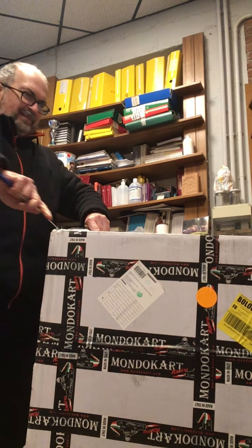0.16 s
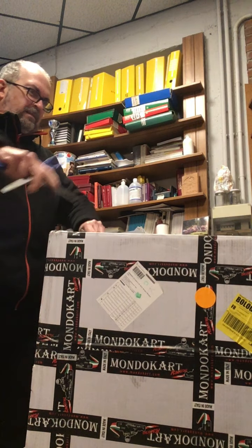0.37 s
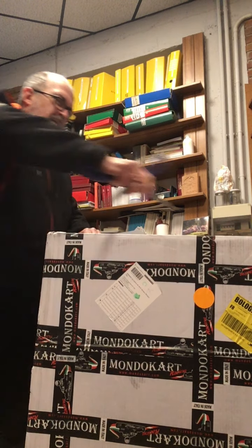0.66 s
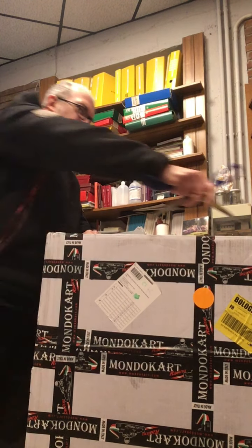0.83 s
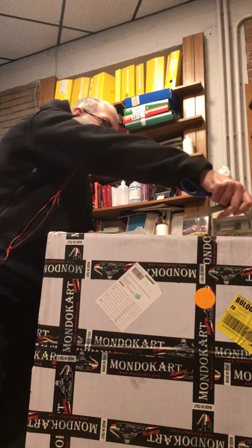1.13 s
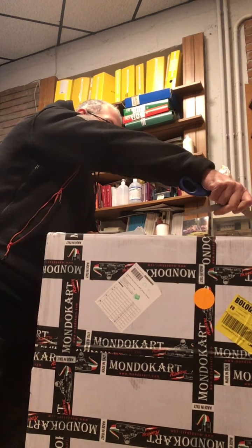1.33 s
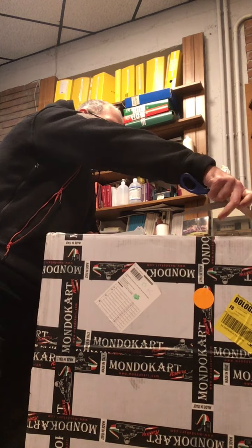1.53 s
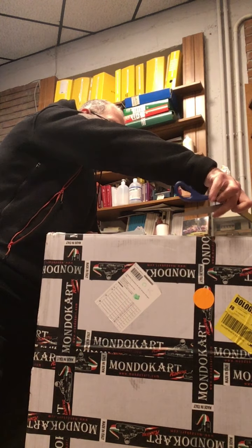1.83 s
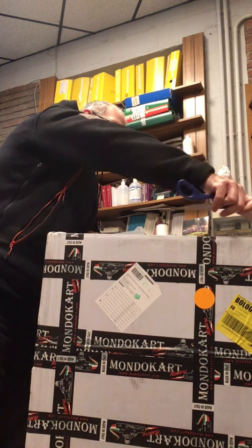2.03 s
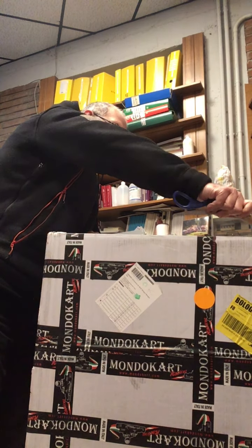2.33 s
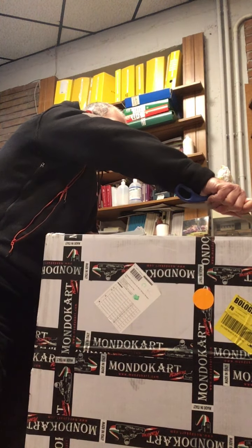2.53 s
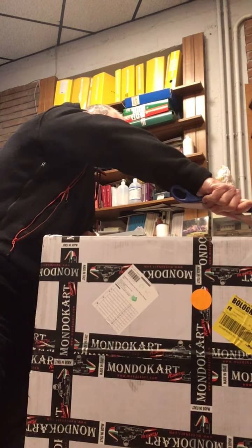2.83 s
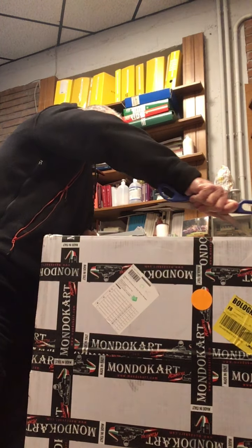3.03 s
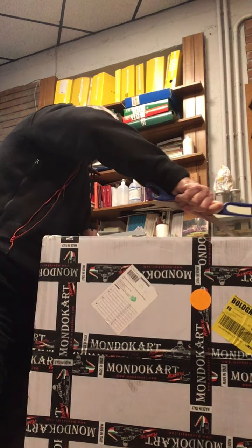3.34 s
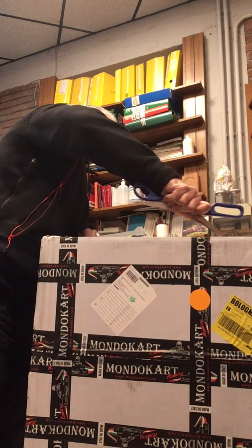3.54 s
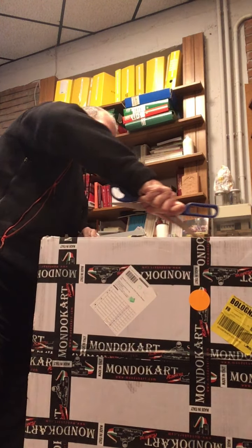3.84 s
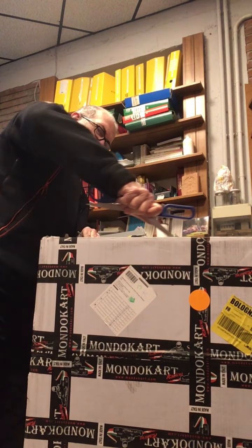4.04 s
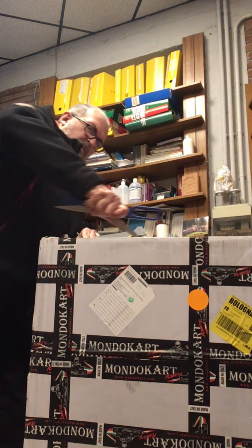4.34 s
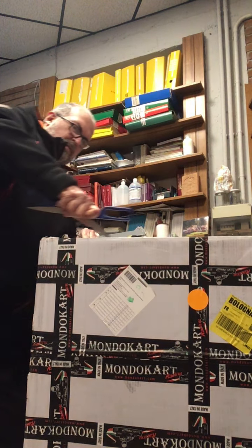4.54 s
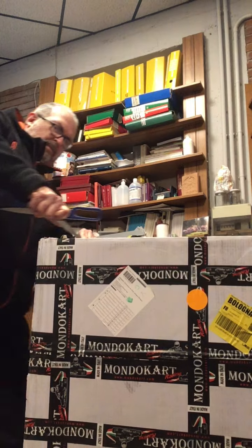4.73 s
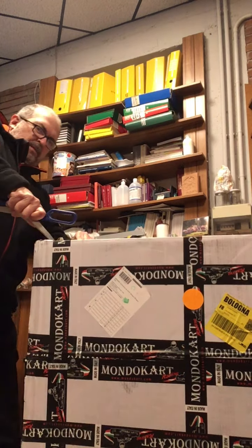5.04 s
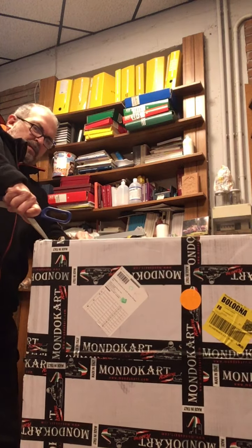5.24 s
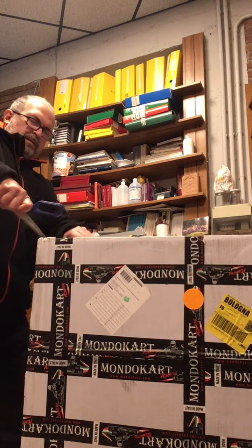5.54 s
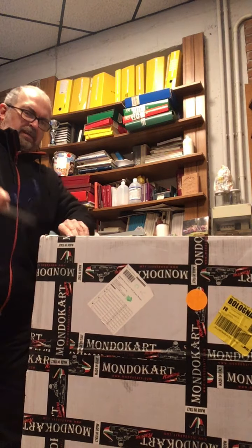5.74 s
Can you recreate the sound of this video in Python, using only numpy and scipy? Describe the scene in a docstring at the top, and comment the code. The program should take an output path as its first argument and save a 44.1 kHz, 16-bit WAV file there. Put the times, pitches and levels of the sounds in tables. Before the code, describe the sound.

In a quiet workshop, scissors scratch and click softly, then thump and tear raspingly through tape and hollow cardboard before thinning out.

```python
"""A small quiet workshop, with a phone a metre from a large cardboard box; steady room air lies under it all.
First an open scissor blade scrapes lightly on card: dense random snaps, filtered as card or tape.
Handling ticks (crackle and ringing steel), scuffs with a note and soft knocks follow.
From 2.9 s, after a hard knock, the blade tears along the taped seam, then from about 4.05 s mostly bare card;
hollow and lid hum under each push. The tearing thins out after 5 s, with two last knocks on the box."""
import sys
import numpy as np
from scipy import signal
from scipy.fft import rfft, irfft
from scipy.io import wavfile

SR = 44100
rng = np.random.default_rng(int(sys.argv[2]) if len(sys.argv) > 2 else 0)


def gain_from_db(level_db):
    """Convert decibel levels to linear amplitude factors (20 dB per decade)."""
    decades = np.asarray(level_db, float) / 20
    return 10 ** decades


def persist_wave(psi):
    """Save psi, clipped to +-1, as 16-bit WAV."""
    counts = np.round(np.clip(psi, -1, 1) * 32767).astype(np.int16)
    wavfile.write(sys.argv[1], SR, np.atleast_2d(counts).T)


N = 259676
T = np.arange(N) / SR  # s

# each push of blade or hand over the box: start t/s, held t/s, scrape level/dB, weight on the box level/dB,
# t/s to die away by 20 dB (before the linger factor; negative means at once)
PUSHES = [(-.03, 0.058, -57, -44.5, 0.09), (.105, 0.042, -65.5, -53.5, -0.1), (.145, 0.051, -71, -65, 0),
          (0.191, 0.085, -58.5, -45, 0.12), (.3, 0.032, -61, -63, -0.1), (0.334, 0.017, -58.5, -52, -0.15),
          (.35, 0.013, -68, -59.5, 0.68), (.4, 0.13, -68.5, -88, 0.7), (.93, 0.032, -81, -64, 0.2),
          (1.076, 0.033, -64, -57.5, 0.1), (1.14, .04, -80, -70, 0.2), (1.2, 0.073, -76, -68, -0.07),
          (1.28, 0.051, -69, -87, .15), (1.572, 0.026, -69.5, -73, -0.5), (1.799, 0.034, -82, -65, -1.4),
          (1.836, 0.033, -66, -61, 0.16), (1.9, 0.013, -83, -73, 0.3), (2.388, .12, -75.5, -66, .2),
          (2.52, .12, -70.5, -64, 0.6), (2.68, 0.15, -68, -65.5, 0.8), (2.775, .03, -65, -63, 0.5),
          (2.812, 0.11, -56, -56, -1.7), (2.92, .06, -45.5, -38.5, .2), (3.002, 0.073, -44.5, -43, 0.13),
          (3.1, .05, -47, -47, 0.2), (3.16, 0.028, -46.5, -44, 0.14), (3.27, 0.038, -58.5, -58, -0.5),
          (3.308, .065, -44.5, -43, 0.17), (3.403, 0.066, -45, -40.5, 0.17),
          (3.528, .02, -43.5, -44.5, 0.1339), (3.593, 0.059, -45.5, -44, 0.34), (3.68, .1, -46, -44, 0.08),
          (3.794, .13, -41.5, -41, 0.12), (3.939, 0.09, -41.5, -40, 0.02), (4.037, 0.041, -50.5, -45, 0.02),
          (4.085, 0.046, -52.5, -43.5, 0.04), (4.13, .035, -60.5, -50.5, -0.5),
          (4.163, 0.14, -51.5, -43.5, 0.13), (4.31, 0.16, -50, -42, 0.25), (4.49, 0.1, -51.5, -43.5, 0.23),
          (4.59, 0.1, -50.5, -43.5, 0.21), (4.7, 0.074, -48, -44.5, 0.17), (4.8, 0.097, -50.5, -45, 0.19),
          (4.89, 0.13, -52, -44, 0.0946), (5.11, 0.11, -71.5, -60, 1.05), (5.196, .075, -57, -50, 0.18),
          (5.298, 0.035, -63.5, -50.5, 0.14), (5.44, .04, -63, -52, 0.25), (5.571, 0.076, -66, -58, -0.08),
          (5.624, 0.026, -57.5, -44, 0.06), (5.664, 0.019, -80, -43.5, -0.02), (5.72, .07, -75, -65, -0.7)]
# what lies under the contact as it travels: t/s, share of taut tape 0-1, wall note f/Hz, lid note f/Hz,
# lid level/dB against the weight
PLACE = [(0, 0.2, 124, 338, -5), (.2, 0, 114.4, 300, -17), (.36, 0.11, 130, 317, -9.5),
         (1.0, 0.4, 110, 348, -16.5), (1.11, 0, 110, 363.5, 3), (1.25, 0.17, 127.3, 359, -19.5),
         (1.75, 0.17, 175, 293.8, -16), (1.87, 0.42, 180.5, 290, -2), (2.05, 0.17, 160, 295, -20),
         (2.5, 0.47, 110, 309, -16), (2.9, .78, 140, 344, -9.5), (3.05, .83, 145.9, 362, -19.5),
         (3.2, 0.92, 189, 351, -4.5), (3.4, 0.97, 139.9, 360, -12), (3.75, 0.87, 165.4, 364, -4),
         (3.87, 0.87, 143.5, 360, -1), (3.94, 0.9, 145.3, 344.8, 4), (4.02, 0.98, 145, 341.7, 2),
         (4.06, 0.1, 145, 342, -0.5), (4.3, 0.11, 134.9, 345, -13), (4.5, 0.1, 125, 365, -6.5),
         (4.62, 0.16, 138, 345, -10), (4.75, 0.12, 126.2, 296, -10.5), (4.95, .27, 139.4, 300, -19),
         (5.2, 0.18, 105, 295, -5), (5.45, 0.06, 105, 295, -13.5), (5.89, 0.1, 105, 330, -12.5)]
# colour of snaps heard through bare card: f/Hz, level/dB (per Hz)
CARD_COLOUR = [(650, -31), (1100, -30), (1340, 1.5), (1640, -3.5), (2140, -7), (2560, -4.5), (4670, -4.5),
               (6450, -5.5), (7790, -6.5), (9730, -0.5), (10600, -9), (12000, -6.5), (15700, -12.5)]


def unit(x):
    """Scale to rms 1."""
    return x / np.sqrt(np.mean(x ** 2))


def colour(x, points, size=1024):
    """Causal filter with the gain of (Hz, dB) points, from the folded cepstrum."""
    hz, db = np.transpose(points)
    bin_hz = np.arange(size // 2 + 1) * SR / size
    gain_db = np.interp(np.log(bin_hz + 1), np.log(hz), db)
    cepstrum = irfft(np.log(gain_from_db(gain_db)))
    cepstrum[1:size // 2] *= 2
    cepstrum[size // 2 + 1:] = 0
    return signal.fftconvolve(x, irfft(np.exp(rfft(cepstrum))))[:N]


def band(x, lo_hz, hi_hz):
    """Steep band-pass."""
    return signal.sosfilt(signal.butter(4, [lo_hz, hi_hz], "bandpass", fs=SR, output="sos"), x)


def ring(x, modes):
    """Sum of resonators (Hz, width Hz, dB)."""
    return sum(gain_from_db(db) * signal.lfilter(*signal.iirpeak(hz, hz / width, SR), x) for hz, width, db in modes)


def jerks(rate, fade_s):
    """Uneven grip: slips of bounded size at random moments (rate per s) that die away; mean 0, spread 1."""
    slips = (rng.random(N) < rate / SR) * rng.random(N)
    x = signal.lfilter([1], [1, -np.exp(-1 / (fade_s * SR))], slips)
    return unit(x - x.mean())


def patchy(x, modes, patchy_db):
    """Each resonance, with steep flanks, comes and goes on its own as the contact point moves."""
    total = 0
    for hz, width, db in modes:
        steep = ring(ring(x, [(hz, 3 * width, 0)]), [(hz, width, db)])
        total = total + gain_from_db(patchy_db * jerks(16, 0.034)) * steep
    return unit(total)


def hum(hz, width, steady):
    """A resonance kept alive by rubbing: gliding note, phase wandering within the width, size evened by steady 0-1."""
    slow = signal.butter(2, width / 2, fs=SR, output="sos")
    wander = signal.sosfilt(slow, rng.standard_normal((2, N)))
    wander = wander / (np.hypot(*unit(wander)) + 0.11) ** steady
    phase = 2 * np.pi * np.cumsum(hz) / SR
    return unit(wander[0] * np.cos(phase) + wander[1] * np.sin(phase))


def columns(table):
    """One value a sample for each column after the time."""
    s, *rest = np.transpose(table)
    return [np.interp(T, s, c) for c in rest]


def card_to_tape(tape, pair):
    """Blend a setting given for (bare card, taut tape) by the share of tape."""
    return np.interp(tape, (0, 1), pair)


def pushes(levels_db, lag, linger, idle_db):
    """Every push rises, holds, dies away and leaves a faint trail; their powers add. Returns dB."""
    bite_s = (0.015, 0.0023)  # rise on (bare card, taut tape), before the lag factor
    trail_db, trail_s = -17, 0.2  # card creeps back: level against the push, s to lose 20 dB
    place_s, tape_share = np.transpose(PLACE)[:2]
    power = gain_from_db(idle_db + 2.1 * jerks(8, 0.028)) ** 2
    for (s, held, _, _, dies), db in zip(PUSHES, levels_db):
        first = max(int(s * SR), 0)
        t = T[first:first + SR] - s
        rise_s = lag * card_to_tape(np.interp(s, place_s, tape_share), bite_s)
        after = np.clip(t - held, 0, 1)
        release_db = -20 * after / max(dies * linger, 0.003)
        fall_db = np.maximum(release_db, trail_db - 20 * after / trail_s)
        power[first:first + SR] += (np.clip(t / rise_s, 0, 1) * gain_from_db(db + fall_db)) ** 2
    return 10 * np.log10(power)


def fibres(rate, scatter_db):
    """Tiny snaps of very unequal size over a fine rubbing noise."""
    size = gain_from_db(scatter_db * rng.exponential(1, N)) * rng.standard_normal(N)
    snaps = (rng.random(N) < rate / SR) * size
    return unit(unit(snaps) + 1.5 * rng.standard_normal(N))


def tearing(hiss_db, rasp_db, tape, grip):
    """Snaps sound through tape or card; the lower rasp has its own snaps, which ring the slit edges."""
    # snaps through taut tape: f/Hz, level/dB (per Hz)
    tape_colour = [(650, 12), (1100, -44), (1680, -54), (1830, 4), (2190, -14), (2530, -0.5), (3090, -6),
                   (4420, -5), (4880, -5.5), (5460, 7.5), (7050, 6), (9520, 0), (10500, -13),
                   (13900, -11.5), (15700, -15)]
    # ringing of the slit edge in tape, then in card: f/Hz, width f/Hz, level/dB
    tape_edge = [(1200, 820, 0), (1893, 205, 0.5), (2475, 124, 3), (3025, 37, -16), (3700, 420, -10.5),
                 (4360, 700, -3)]
    card_edge = [(1321, 123, 6.5), (1500, 104, 6), (1936, 670, 2), (2187, 84, 5.5), (3010, 300, -2),
                 (3790, 1750, -9), (4430, 88, -13)]
    # whistle of the taut film beside the slit: f/Hz, width f/Hz, level/dB
    tape_whistle = [(5550, 550, 2), (6740, 90, -9), (6870, 180, -6), (7140, 99, 7), (8900, 130, -11)]

    def gripped(rate):
        return fibres(rate, scatter_db=1.0) * gain_from_db(0.98 * grip + 0.65 * jerks(35, 0.0061))

    def hiss(points):
        return unit(band(colour(fine, points), 4590, 15200)) * gain_from_db(0.53 * jerks(43, 0.0037))

    def rasp(points, edge):
        body = unit(band(colour(coarse, points), 740, 4730))
        edge_ring = patchy(band(coarse, 1080, 5250), edge, patchy_db=3)
        return unit(body + gain_from_db(-3.5) * edge_ring)

    fine, coarse = gripped(5000), gripped(1800)
    tape_hiss = hiss(tape_colour) + gain_from_db(-7.5) * patchy(fine, tape_whistle, patchy_db=5.0)
    all_hiss = tape * tape_hiss + (1 - tape) * hiss(CARD_COLOUR)
    all_rasp = tape * rasp(tape_colour, tape_edge) + (1 - tape) * rasp(CARD_COLOUR, card_edge)
    return gain_from_db(hiss_db) * all_hiss + gain_from_db(rasp_db) * all_rasp


def box(boom_db, wall_db, lid_db, flap_db, wall_hz, lid_hz, grip):
    """The dragging force shakes the air hollow, walls, lid and flaps of the box."""
    # resonances of the air hollow, then of the flaps: f/Hz, width f/Hz, level/dB
    hollow = [(60.8, 23, -2.5), (105, 21.5, -3.5), (139.7, 11.2, -0.5), (187, 29, -12)]
    flaps = [(445.4, 43, 7.5), (521, 13.7, 9.5), (602.5, 72, 7), (695, 113, 2), (897, 70, 1),
             (955, 130, -6.5), (985, 36, -3.5), (1041, 15, -8.5)]
    shake = rng.standard_normal((2, N)) * gain_from_db(1.3 * grip)
    wall = hum(wall_hz, width=21.4, steady=0.29) * gain_from_db(wall_db)
    boom = unit(ring(shake[0], hollow)) * gain_from_db(-2.0) + wall
    lid = hum(lid_hz, width=17.7, steady=0.6) + gain_from_db(-4) * hum(lid_hz, width=90, steady=0.077)
    rattle = patchy(shake[1], flaps, patchy_db=1.5)
    return gain_from_db(boom_db) * boom + gain_from_db(lid_db) * lid + gain_from_db(flap_db) * rattle


def snags(snag_db):
    """The edge snags on lumps: short broad crackles at random moments, as loud as the scrape allows."""
    # colour of the crackle: f/Hz, level/dB (per Hz)
    snag_colour = [(500, -21), (1000, -3), (2500, -2.5), (6000, -3.5), (10000, -4), (15700, -11)]
    snags_per_s, fade_s = 60, 0.0016
    hit = (rng.random(N) < snags_per_s / SR) * gain_from_db(14.5 * rng.random(N))
    envelope = signal.lfilter([1], [1, -np.exp(-1 / (fade_s * SR))], hit)
    burst = envelope * rng.standard_normal(N)
    return gain_from_db(snag_db) * unit(colour(burst, snag_colour))


def room_air():
    """Steady noise of the quiet workshop, strongest in the bass."""
    # colour of the room: f/Hz, level/dB (per Hz)
    room_colour = [(18, -8.5), (30, -2.5), (64, 9), (81, -31.5), (156, -6), (169, -52), (238, -0.5),
                   (508, -56), (857, -21), (2140, -26), (10100, -39), (11500, -24.5), (15700, -35.5)]
    return gain_from_db(-72.5) * unit(colour(rng.standard_normal(N), room_colour, size=4096))


def ticks():
    """Each tick is a short burst of crackle mixed with ringing steel, strongest near its brightest pitch."""
    # ticks and snaps: t/s, level/dB, brightest f/Hz, metal ring share 0-1
    tick_list = [(0.396, -41, 11300, 0.64), (0.459, -45, 8710, 0.6), (0.5933, -39.5, 12000, .48),
                 (1.091, -44.5, 10100, 0.3), (1.095, -37.5, 10100, .46), (1.1093, -41, 6610, 0.46),
                 (1.1183, -48, 8730, .6), (1.5709, -38.5, 9350, 0.66), (1.841, -54, 3720, .1),
                 (1.8524, -40, 7340, 0.7), (1.855, -34.5, 4030, 0.64), (1.8572, -33.5, 10100, 0.4),
                 (1.87, -31, 7950, 0.47), (1.8763, -36, 11300, 0.4), (1.897, -38, 9150, 0.37),
                 (2.389, -66, 5940, 0.3), (2.6324, -50, 8700, 0.1), (2.815, -37.5, 6020, 0.4),
                 (2.92, -25, 6160, 0.4), (3.3093, -32, 6700, .46), (3.4054, -41, 6464, .04),
                 (3.5313, -36, 6300, 0.05), (3.598, -33.5, 6423, 0), (4.0523, -36, 4646, 0),
                 (4.073, -40, 9800, .27), (4.165, -42, 4530, 0.08), (4.2624, -35, 4090, 0.2),
                 (4.5093, -33.5, 5225, 0.4), (4.6078, -32, 9420, 0.3), (4.766, -32.5, 3940, 0.45),
                 (4.997, -33, 5970, 0.35), (5.022, -31.5, 5360, 0.3), (5.246, -36.5, 4270, .45),
                 (5.458, -37.5, 3820, 0.27), (5.635, -59, 5010, 0.55)]
    # ringing of the scissors: f/Hz, level/dB (before scatter and distance in pitch), t60 t/s
    blades = [(534, 10, 0.053), (2620, 11, .03), (3640, 18, 0.02), (4390, 14.5, 0.024), (7540, 17, 0.019),
              (8700, 22, .035), (8970, 0.5, 0.018), (9650, -4, 0.012), (11300, 12.5, 0.036),
              (11700, -24, .04), (14550, 11, 0.016)]
    crackle_ms = 2.35
    out, t = np.zeros(N + SR), T[:SR // 5]
    for s, db, top_hz, metal in tick_list:
        envelope = np.exp(-(t * 1000 / crackle_ms) ** 2) * np.tanh(t * 2500)
        crackle = colour(rng.standard_normal(len(t)) * envelope, CARD_COLOUR)[:len(t)]
        crackle = crackle + 5.5 * ring(crackle, [(top_hz, top_hz / 5, 0)])
        steel = np.zeros(len(t))
        for hz, mode_db, t60 in blades:
            scatter, turn = rng.standard_normal(2)
            gain = gain_from_db(mode_db + 2 * scatter - 1.1 * abs(np.log2(hz / top_hz)))
            steel += gain * np.sin(2 * np.pi * (hz * t + turn)) * np.exp(-np.log(1000) * t / t60)
        tick = (1 - metal) * crackle / np.abs(crackle).max() + metal * steel / np.abs(steel).max()
        first = int(s * SR)
        out[first:first + len(t)] += gain_from_db(db) * tick
    return out[:N]


def scuffs(rasp_db, grip):
    """A finger or blade tip scuffs with its own note: it swells around each moment, on the nearest one's note."""
    # scuffs: middle t/s, length t/s, note f/Hz, level/dB above the rasp
    scuff_list = [(.55, 0.069, 3150, 0), (1.22, .03, 9503, 7), (1.32, 0.056, 2202, 3),
                  (1.8, 0.36, 3550, -12), (3.0, .1, 3700, -7.5), (4.6, 0.12, 2082, -9.5),
                  (4.78, .1, 1406, -11.5), (5.32, 0.054, 1500, 3.5), (5.44, 0.045, 1598, 5.5)]
    middle, _, note_hz, _ = np.transpose(scuff_list)
    nearest = np.searchsorted((middle[1:] + middle[:-1]) / 2, T)
    swell = sum(gain_from_db(db) * np.exp(-((T - s) / length) ** 2) for s, length, _, db in scuff_list)
    tone = hum(note_hz[nearest], width=1100, steady=0.044)
    return gain_from_db(rasp_db) * swell * gain_from_db(2.5 * grip) * tone


def knocks():
    """Each knock rings the panel it lands on: a decaying sine with a soft start."""
    # knocks on the box: t/s, level/dB, ring f/Hz, t60 t/s
    knock_list = [(1.096, -51, 370, 0.045), (1.574, -58, 496, 0.14), (1.854, -48, 246, 0.16),
                  (1.872, -49, 300, 0.074), (2.545, -41.5, 125, 0.036), (2.55, -52.5, 287.7, 0.085),
                  (2.7, -47, 143, 0.12), (2.702, -45, 284, 0.06), (2.92, -28.5, 718, 0.08),
                  (2.921, -34, 450, .05), (2.924, -24, 132, 0.13), (5.234, -42.5, 118.6, 0.45),
                  (5.641, -33.5, 105, 0.15), (5.65, -46.5, 562.3, 0.093)]
    out, t = np.zeros(N), T[:SR // 3]
    for s, db, hz, t60 in knock_list:
        decay = np.exp(-np.log(1000) * t / t60)
        blow = np.sin(2 * np.pi * hz * t) * decay * (1 - np.exp(-t / 0.0035))
        first = int(s * SR)
        out[first:first + len(t)] += (gain_from_db(db) * blow)[:N - first]
    return out


def workshop(x):
    """One near wall answers first, then a short tail."""
    echo_s, echo_db, tail_t60_s, tail_db = 0.0108, -14, 0.44, -20
    t = T[:SR // 2]
    tail = rng.standard_normal(len(t)) * np.exp(-np.log(1000) * t / tail_t60_s) * (t > echo_s)
    response = gain_from_db(tail_db) * tail / np.sqrt(np.sum(tail ** 2))
    response[0] = 1  # direct sound
    response[int(echo_s * SR)] = gain_from_db(echo_db)
    return signal.fftconvolve(x, response)[:N]


def scene():
    """Tearing, box and scissors in the room, over its steady air."""
    _, _, scrape_levels, weight_levels, _ = np.transpose(PUSHES)
    # idle levels: sleeve and hand resting on the card; the weight rises and dies away more slowly
    scrape_db = pushes(scrape_levels, lag=0.55, linger=0.94, idle_db=-86.5)
    weight_db = pushes(weight_levels, lag=1.73, linger=1.085, idle_db=-73)
    tape, wall_hz, lid_hz, lid_db = columns(PLACE)

    # dB against the scrape, on (bare card, taut tape)
    rasp_db = scrape_db + card_to_tape(tape, (-2, -6.5))
    snag_db = scrape_db + card_to_tape(tape, (-8.5, -13.5))
    flap_db = scrape_db + card_to_tape(tape, (-9.5, -3))
    flap_db = flap_db + 0.29 * (weight_db - scrape_db)  # flaps rattle partly with the weight
    wall_db = card_to_tape(tape, (-4, -7.5))  # within the boom

    grip = jerks(40, 0.022) + 0.45 * jerks(200, 0.017)
    near = tearing(scrape_db, rasp_db, tape, grip)
    near = near + box(weight_db, wall_db, weight_db + lid_db, flap_db, wall_hz, lid_hz, grip)
    near = near + snags(snag_db) + ticks() + scuffs(rasp_db, grip) + knocks()
    return (workshop(near) + room_air())[None]


def top_cut(x):
    """Nothing passes above the cut-off."""
    return signal.sosfilt(signal.butter(12, 15900, fs=SR, output="sos"), x)


def record(dry):
    """The phone, a metre away, drops the deepest bass (below 42 Hz)."""
    x = signal.sosfilt(signal.butter(4, 42, "highpass", fs=SR, output="sos"), dry)
    return top_cut(x)


dry = scene()
out = record(dry)
persist_wave(out)
```